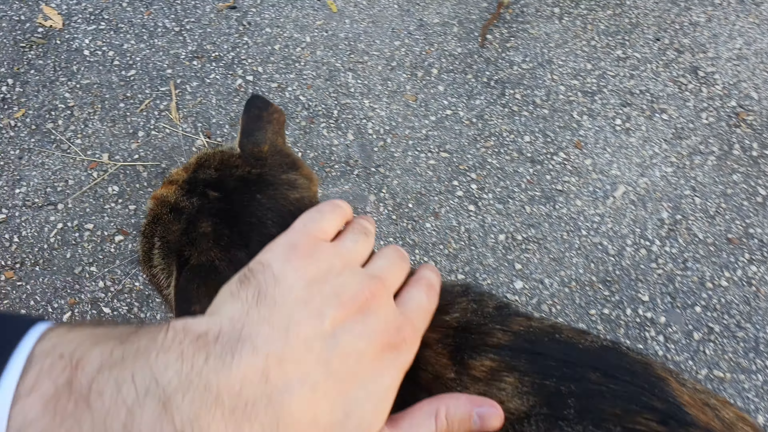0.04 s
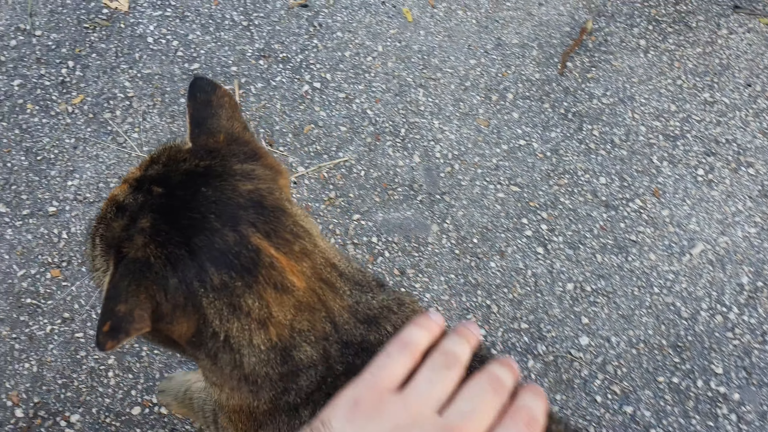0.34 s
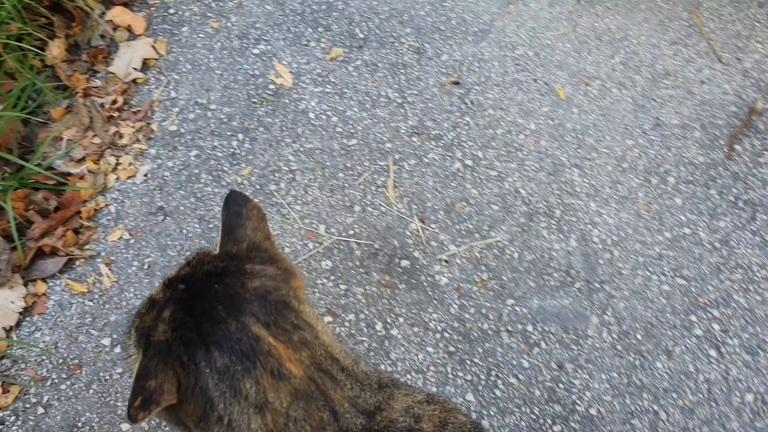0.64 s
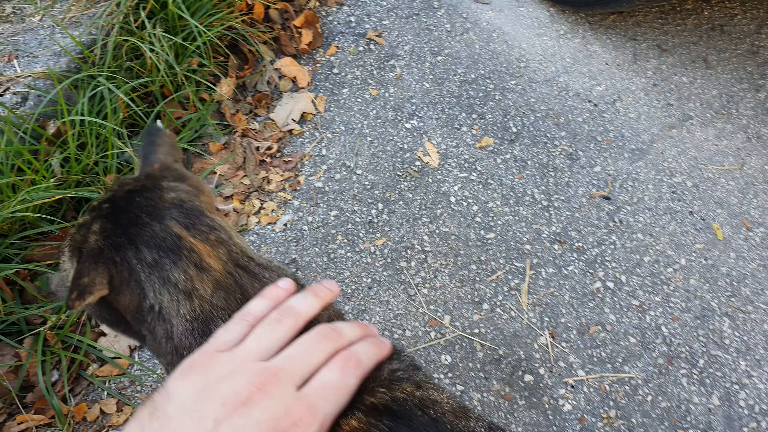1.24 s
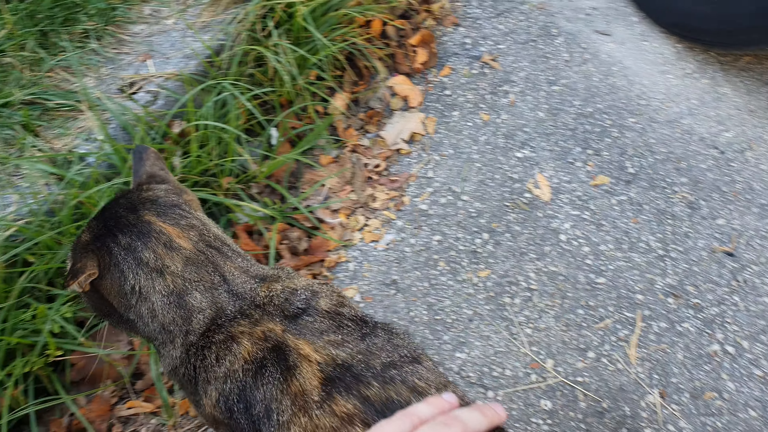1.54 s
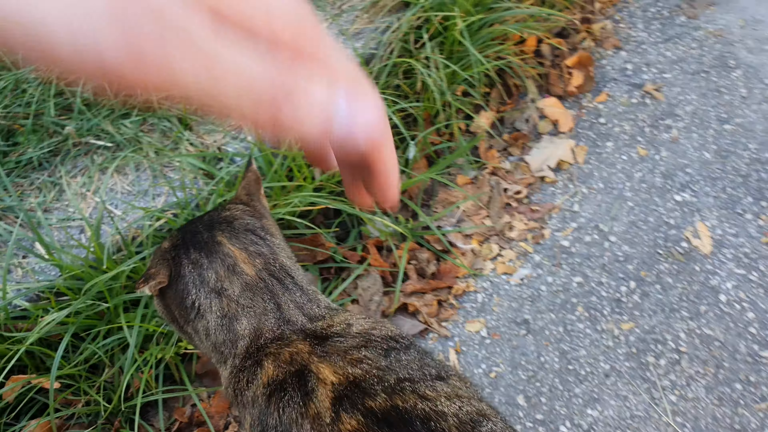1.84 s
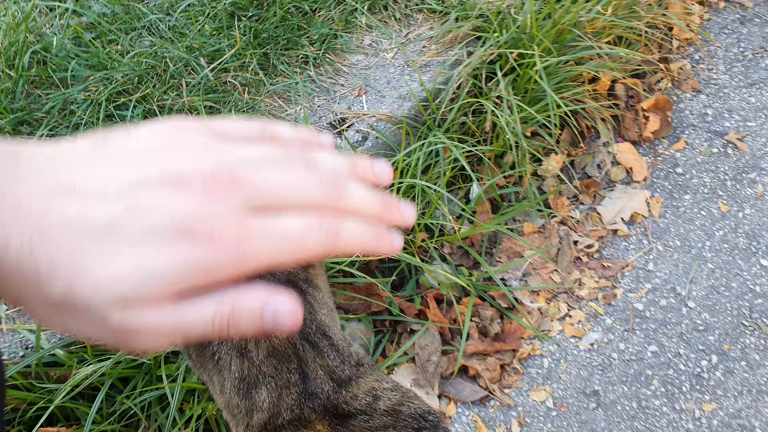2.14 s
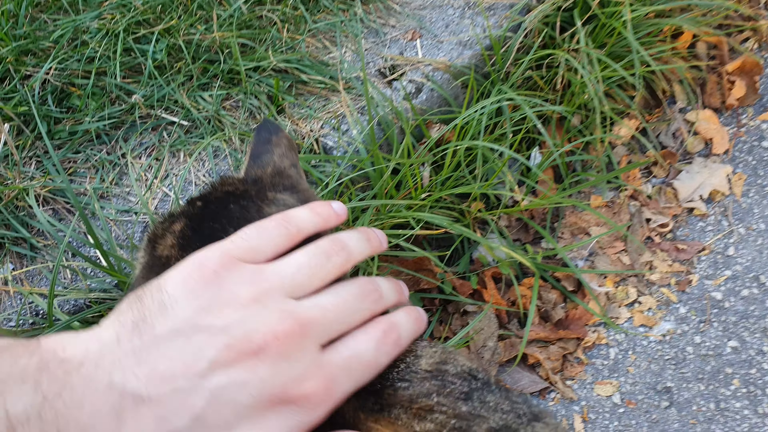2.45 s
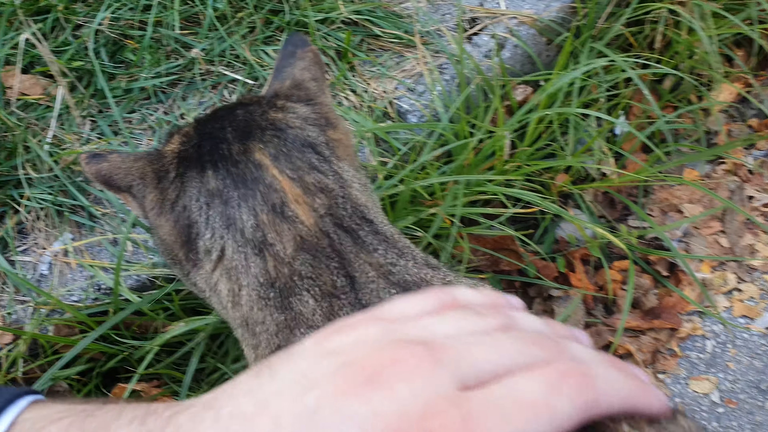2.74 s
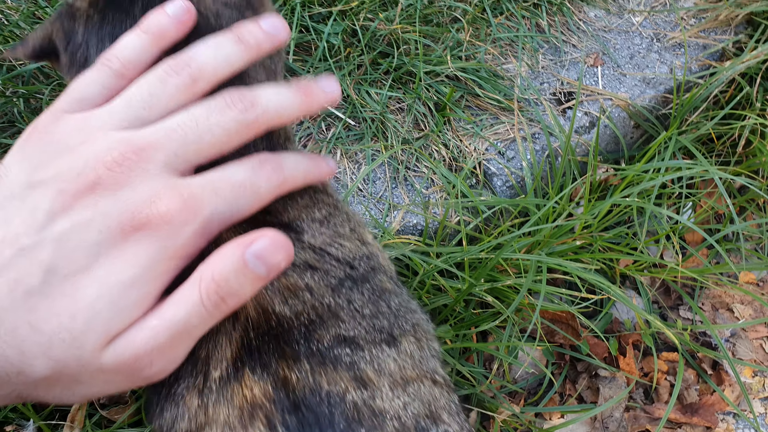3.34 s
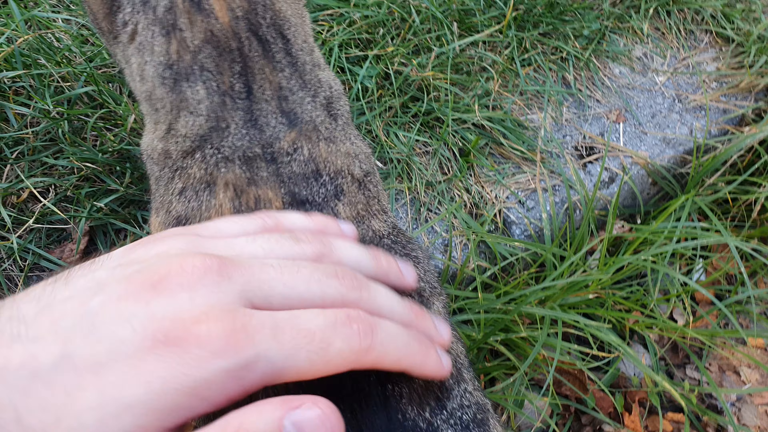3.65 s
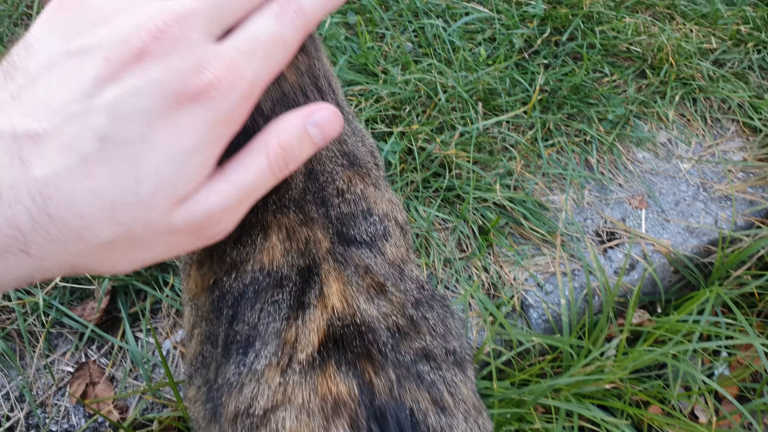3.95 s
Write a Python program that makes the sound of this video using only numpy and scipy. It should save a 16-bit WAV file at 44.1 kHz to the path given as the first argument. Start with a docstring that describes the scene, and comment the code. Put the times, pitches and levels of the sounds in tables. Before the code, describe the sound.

A hand strokes a cat, its fur hissing softly as a sleeve swishes with each reach. Dry leaves tick and crunch underfoot over a low rumble of light wind, and fingers knock lightly on the close, hand-held microphone.

```python
"""Fur hisses softly over a low rumble of light wind as a hand strokes a cat outdoors, close to a
hand-held camera. The hiss is stick-slip friction, as is the swish of the sleeve on each reach; hollows
under the hand resonate with it. Dry leaves and grass tick and crunch underfoot in fast-decaying bursts,
and fingers shifting on the camera add a grumble and small knocks."""
import sys
import numpy as np
from scipy import signal
from scipy.fft import rfft, irfft
from scipy.io import wavfile

SR = 44100
rng = np.random.default_rng(int(sys.argv[2]) if len(sys.argv) > 2 else 0)


def to_wav(sig):
    """Store sig (one row per channel, or 1-D mono) as 16-bit WAV at the path in sys.argv[1].

    Samples outside -1..1 are clipped; the rate is SR.
    """
    pcm = np.clip(np.atleast_2d(sig), -1, 1) * 32767
    pcm = np.round(pcm).astype(np.int16)
    wavfile.write(sys.argv[1], SR, pcm.T)  # frames by channels


N = 176400
T = np.arange(N) / SR

# spectra of the sources: (frequency [Hz], relative density [dB])
AIR_SPECTRUM = [(150, -1), (250, 3.5), (400, -6), (700, -7), (1000, -13.5), (2000, -36.5)]
WIND_SPECTRUM = [(20, -15), (32, -18.5), (42, -13), (54, -3.5), (75, -2), (105, -4.5), (130, -17.5),
                 (220, -30)]
GRIP_SPECTRUM = [(90, -9), (130, 1.5), (155, 3.5), (200, -2), (260, -6), (350, -12), (550, -22.5),
                 (1000, -37)]
KNOCK_SPECTRUM = [(70, -3), (150, -7.5), (260, 10), (450, -1.5), (800, -10), (1400, -15), (2300, -50),
                  (4000, -57)]
SNAP_SPECTRUM = [(200, -29), (450, -14), (1100, 4.5), (1450, 11.5), (1900, -3), (2400, 5), (3200, 3.5),
                 (4500, 2.5), (6800, 3), (8200, -11.5), (10300, -21), (11600, -4), (15000, -9), (16000, -4)]
BRUSH_SPECTRUM = [(700, -2), (1500, -7), (2500, -2.5), (3900, 1.5), (6500, -0.5), (8200, -8.5),
                  (12500, -4.5), (16000, -12.5)]
RUB_SPECTRUM = [(230, -11.5), (350, -6), (480, 5.5), (680, -3), (850, -2), (1100, -11.5), (2000, -22)]
SLEEVE_SPECTRUM = [(600, -12), (950, -6), (1250, 0.5), (1500, 0.5), (1800, -2), (2300, -5), (3200, -5.5),
                   (5000, -7.5), (9000, -17)]
FUR_SPECTRUM = [(1200, -22), (2000, -2), (3000, 0), (4500, 1), (6800, 0), (7900, -10.5), (11000, -6.5),
                (12000, -9), (14500, -9.5), (16000, -28)]
# envelopes of the sustained sources: (time [s], relative level [dB])
WIND_LEVEL = [(0.0, -45), (0.2, -44), (0.52, -50), (0.6, -57), (0.66, -49), (0.9, -45.5), (1.0, -51.5),
              (1.25, -47), (1.8, -50.5), (1.9, -48), (2.2, -47.5), (2.32, -52.5), (2.56, -43.5),
              (2.63, -48), (2.72, -40.5), (2.85, -42.5), (2.95, -50), (3.22, -46.5), (3.52, -49.5),
              (3.63, -43), (4.0, -47.5)]
GRIP_LEVEL = [(0, -54), (.45, -54.5), (.7, -53.5), (.9, -54), (1.1, -59), (1.7, -58), (1.95, -52.5),
              (2.4, -55.5), (2.7, -50.5), (2.79, -53), (2.845, -43.5), (2.93, -52), (3.02, -53.5),
              (3.1, -50), (3.24, -54.5), (3.33, -54), (3.45, -50), (3.65, -53), (3.8, -54.5), (4, -51.5)]
RUB_LEVEL = [(0, -65.5), (.35, -62.5), (.55, -64), (.72, -61.5), (.87, -59.5), (1.14, -72), (1.47, -86),
             (1.59, -64.5), (1.98, -61), (2.36, -71), (2.54, -60), (2.8, -62.5), (3.3, -69.5), (4, -71)]
SLEEVE_LEVEL = [(0, -64), (.56, -71), (.66, -61.5), (.88, -60.5), (1.05, -70.5), (1.5, -78), (1.65, -64.5),
                (1.81, -57.5), (2.12, -62), (2.4, -70), (2.58, -62), (3.0, -68), (3.4, -71), (3.75, -74.5),
                (4, -66.5)]
FUR_LEVEL = [(0, -61), (.22, -57.5), (.48, -64), (.70, -59.5), (.91, -61.5), (1.0, -69.5), (1.12, -66),
             (1.2, -68), (1.36, -68), (1.54, -72), (1.68, -64.5), (1.82, -56), (2.12, -61), (2.40, -67.5),
             (2.61, -59.5), (2.78, -63), (2.94, -64.5), (3.15, -68.5), (3.5, -71), (3.72, -72), (3.81, -73),
             (3.92, -63), (4, -77)]
# likeness of left and right: (frequency [Hz], correlation [-])
CORRELATION = [(30, 1), (60, 0.96), (170, 0.93), (350, 0.8), (700, 0.34), (1400, -0.28), (2800, -0.036),
               (5600, -0.14), (12000, 0.016)]
# balance, mostly leftward: (frequency [Hz], left minus right [dB])
BALANCE = [(30, 3), (80, 0.5), (170, 1), (350, 3), (700, 4.5), (1400, 3.5), (2800, 2.6), (4500, 0),
           (6500, -1.5), (8500, 11.5), (11000, 7), (15000, 7)]
# reflections between hand and camera: (delay [s], gain [-])
ECHOES = [(.0011, 0.12), (.0027, .16), (.0058, 0.11)]
# low tones in the rumble: (frequency [Hz], bandwidth [Hz], level [dB])
DRONE_BANDS = [(52.9, 2, -54.5), (104.7, 4.6, -63), (152.3, 11.2, -71)]
# passing hums: (time [s], half length [s], frequency [Hz], glide [Hz/s], level [dB])
HUM_SWELLS = [(0.38, 0.073, 181.2, -33, -55.5), (0.49, 0.046, 60.8, -58, -43),
              (1.96, 0.041, 151.4, -10, -52.5), (2.24, 0.023, 52.3, -5, -41),
              (2.55, 0.035, 62.8, 110, -44.5), (2.845, 0.019, 88, 0, -47), (2.835, 0.016, 154, 0, -52),
              (3.12, 0.055, 149.5, -78, -50), (3.25, 0.036, 228, 0, -54.5), (3.6, 0.14, 166, -2, -57.5)]
# knocks of the grip: (time [s], strength [dB])
GRIP_KNOCKS = [(1.836, -36), (1.957, -38), (2.0415, -35.5), (2.552, -40), (2.820, -49), (2.834, -46),
               (2.909, -42), (3.058, -41), (3.200, -37), (3.451, -41.5), (3.609, -38), (3.734, -40),
               (3.89, -45)]
# struck twigs and leaves: (time [s], mode 1 [Hz], level [dB], mode 2 [Hz], level [dB], decay [s])
TWIG_MODES = [(1.838, 1110, -38, 2480, -38.5, 0.0018), (1.962, 1380, -39, 2100, -37, 0.0011),
              (2.0425, 470, -42.5, 1830, -48, 0.0037), (2.1037, 2230, -35, 4200, -53, 0.001),
              (2.2136, 1780, -38.5, 4800, -36, 0.0022), (3.4497, 480, -44.5, 1290, -51.5, 0.0025),
              (3.611, 430, -43.5, 1320, -54.5, 0.0029), (3.8895, 4400, -34.5, 630, -34, 0.00069),
              (3.9216, 4200, -41, 785, -40, 0.00095)]
# breaking leaves and twigs:
# (time [s], strength [dB], body gain [dB], treble gain [dB], tail gain [dB], left minus right [dB])
LEAF_SNAPS = [(0.3506, -43, -6, -7, -10, 7), (0.52, -42.5, -12, -15, -7, 0),
              (0.574, -43.5, -31, 4, -14, -15), (0.591, -42, -26, 4, -20, -1),
              (0.622, -36, -26, 3, -20, -2), (.6735, -34.5, -24, 9, -14, -5), (0.696, -37, -24, 2, -22, 0),
              (0.718, -40, -24, 3, -20, 1.5), (0.751, -34.5, 4, 6, -19, -6), (0.869, -37, -24, -2, -18, -8),
              (.912, -34, -12, 2, -22, -6), (0.9203, -24, -22, 15, -32, 4), (0.987, -42, -24, -2, -20, -1),
              (1.036, -44.5, -28, -2, -5, -6), (1.066, -47.5, -20, 1, -3, -1),
              (1.105, -50, -22, -4, -8, -8), (1.167, -44, -22, 1, -9, 1), (1.208, -47.5, -24, -9, -10, -5),
              (1.261, -48.5, -22, 1, 2, 0), (1.838, -29, 0, -24, -26, 6), (1.9621, -30, -2, -7, -9.5, 0),
              (1.9705, -47, -12, 10, -16, 0), (2.042, -43.5, 8, -21, -10, 12),
              (2.1032, -37.5, -10, -30, -1.5, -5), (2.2131, -18, -16, 8, -13, 0),
              (2.2563, -37, -14, -38, -8, 2), (2.444, -44, -10, 7, -18, 5), (2.531, -39, 7, 11, -9, 6),
              (2.601, -38.5, -5, -28, -11, 8), (2.632, -34.5, -20, 5, -11, 5.5),
              (3.1998, -46, 28, -14, -14, -3), (3.215, -46, -32, -1, -4, -6),
              (3.2796, -35.5, -30, 12, -15, -18), (3.45, -57, 22, -20, -16, 0), (3.476, -42, 9, 7, -5, -5),
              (3.531, -45.5, -18, 4, -6, 3), (3.576, -46, -24, 0, -22, 5), (3.611, -44.5, -19, 2, -12, -3),
              (3.617, -42.5, -14, 8, -5, 5), (3.7135, -47, -4, -14, -6, -6), (3.823, -44, -6, -9, -10, -17),
              (3.835, -41, -4, -8, -12, -3), (3.8452, -38, -8, -27, -8, -4), (3.857, -42, 8, -16, -10, -6),
              (3.8892, -37.5, -7, -27, -6.5, -1), (3.9229, -37, -7, -24, -6.5, -2)]
# hollows: (time [s], half length [s], frequency [Hz], glide [Hz/s], bandwidth [Hz], level [dB])
CAVITIES = [(0.201, 0.15, 3200, -1500, 1100, -60.5), (0.67, 0.13, 1290, 302, 110, -69),
            (0.732, 0.069, 840, 139, 120, -60), (0.866, 0.024, 637, 0, 70, -57),
            (1.297, 0.27, 631, -56, 49.7, -70), (1.076, 0.15, 1690, -600, 133, -71.5),
            (1.845, 0.03, 1140, 0, 130, -76), (2.557, 0.029, 895, 3, 130, -61),
            (2.738, 0.066, 885, -300, 90, -61.5), (2.751, 0.11, 586, 0, 90, -72),
            (3.018, 0.021, 4100, 0, 260, -63), (3.273, 0.064, 4660, 3000, 260, -67),
            (3.55, 0.22, 756, 0, 40, -73)]
# brief brushes: (time [s], half length [s], level [dB], left minus right [dB])
BRUSH_SWELLS = [(0.707, 0.024, -54, -5), (0.783, 0.035, -65, 0), (2.216, 0.0053, -50.5, 13),
                (2.244, 0.017, -49, -1), (2.634, 0.052, -62.5, -1), (3.03, 0.02, -51.5, -0.5),
                (3.28, 0.07, -59, -6), (3.523, 0.058, -62, -7), (3.832, 0.011, -49, -3),
                (3.873, 0.014, -57, -3)]


def from_db(db):
    """Decibels to amplitude ratio."""
    return 10 ** (np.asarray(db) / 20)


def rms_one(x):
    """Normalisation to unit power."""
    return x / np.sqrt(np.mean(x ** 2) + 1e-20)


def level(rows, offset_db):
    """Amplitude envelope, interpolated in decibels."""
    return from_db(np.interp(T, *np.transpose(rows)) + offset_db)


def swell(time, half):
    """Gaussian envelope with standard deviation `half`."""
    return np.exp(-.5 * ((T - time) / half) ** 2)


def at_hz(points, hz):
    """Interpolation on a log-frequency axis."""
    frequencies, values = np.transpose(points)
    return np.interp(np.log(hz + 1), np.log(frequencies), values)


def pan(db):
    """A level difference between the ears gives direction."""
    return from_db(np.array([[db], [-db]]) / 2)


def add(out, time, sound):
    """Superposition of a short sound at its onset."""
    start = max(int(time * SR), 0)
    out[:, start:start + sound.shape[1]] += sound[:, :max(N - start, 0)]


def coloured(pair, spectrum):
    """Mid-side filtering gives two independent signals a spectrum and stereo width, at unit power."""
    hz = np.linspace(1, SR / 2, pair.shape[1] // 2 + 1)
    low_hz, high_hz = spectrum[0][0] / 2, spectrum[-1][0] * 2
    skirts = 1 / np.sqrt((1 + (hz / high_hz) ** 4) * (1 + (low_hz / hz) ** 4))
    mid, side = rfft(pair) * from_db(at_hz(spectrum, hz)) * skirts
    alike = np.clip(at_hz(CORRELATION, hz), -.99, .99)
    signs = np.array([[1], [-1]])
    stereo = np.sqrt(1 + alike) * mid + np.sqrt(1 - alike) * side * signs
    return rms_one(irfft(stereo * from_db(signs * at_hz(BALANCE, hz) / 2)))


def drift(half_width_hz, centre_hz=0):
    """Narrow-band noise of unit power: the narrower, the slower it fluctuates."""
    hz = np.linspace(0, SR / 2, N // 2 + 1)
    return rms_one(irfft(rfft(rng.standard_normal(N)) / (1 + ((hz - centre_hz) / half_width_hz) ** 2)))


def friction(spectrum, grains_per_s, grain_share, spread_db, flutter_db):
    """Stick-slip: many fibres slide as a hiss, single ones catch and click, and the pressure flutters."""
    sizes = from_db(spread_db * np.minimum(rng.exponential(1, N), 4))
    catches = rng.random(N) < grains_per_s / SR
    grains = rms_one(catches * sizes * rng.standard_normal((2, N)))
    slips = np.sqrt(grain_share) * grains + np.sqrt(1 - grain_share) * rng.standard_normal((2, N))
    return coloured(slips, spectrum) * from_db(flutter_db * drift(54))


def burst(spectrum, decay_s, tail_s, tail_db, size=4096):
    """Impulsive contact: noise with a fast exponential decay and a longer tail of scatter."""
    t = np.arange(size) / SR
    envelope = np.exp(-t / decay_s) + from_db(tail_db) * np.exp(-t / tail_s)
    sound = coloured(rng.standard_normal((2, size)), spectrum) * envelope
    return rms_one(sound) * np.sqrt(np.mean(envelope ** 2)) / 2


def air(level_db=-66.5):
    """Distant outdoor sounds merge into stationary noise."""
    return from_db(level_db) * coloured(rng.standard_normal((2, N)), AIR_SPECTRUM)


def rumble():
    """Turbulence of light wind, over a far drone that wavers as narrow-band noise does."""
    drone = sum(from_db(db) * drift(width / 2, hz) for hz, width, db in DRONE_BANDS)
    wind = level(WIND_LEVEL, 0) * coloured(rng.standard_normal((2, N)), WIND_SPECTRUM)
    return drone + wind


def hums():
    """Low tones swell and fade, most gliding as linear chirps."""
    out = 0
    for time, half, hz, glide, db in HUM_SWELLS:
        cycles = hz * (T - time) + glide * (T - time) ** 2 / 2 + rng.random()
        out += from_db(db) * swell(time, half) * np.sqrt(2) * np.sin(2 * np.pi * cycles)
    return out


def handling(attack_s=0.00052, size=4096):
    """Structure-borne sound: fingers rub and softly knock on the camera."""
    out = friction(GRIP_SPECTRUM, grains_per_s=39, grain_share=0.22, spread_db=1.5, flutter_db=1)
    out *= level(GRIP_LEVEL, -0.5)
    attack = 1 - np.exp(-np.arange(size) / SR / attack_s)
    for time, db in GRIP_KNOCKS:
        knock = burst(KNOCK_SPECTRUM, decay_s=0.0045, tail_s=0.0085, tail_db=-21)
        add(out, time, from_db(db) * attack * knock)
    return out


def taps(size=2048):
    """Free vibration: a struck twig or stiff leaf rings in two damped modes."""
    out, t = np.zeros((2, N)), np.arange(size) / SR
    for time, main_hz, main_db, second_hz, second_db, decay_s in TWIG_MODES:
        for hz, db in (main_hz, main_db), (second_hz, second_db):
            phase = 2 * np.pi * hz * t + rng.uniform(-1, 1, (2, 1))
            add(out, time, from_db(db) * np.exp(-t / decay_s) * np.sin(phase))
    return out


def snaps():
    """Brittle fracture of leaves and twigs: thick ones have more body, thin ones more treble."""
    out = np.zeros((2, N))
    hz, db = np.transpose(SNAP_SPECTRUM)
    body = at_hz([(1200, 1.0), (3500, 0.058)], hz)
    treble = at_hz([(6000, 0), (11000, 1)], hz)
    for time, strength_db, body_db, treble_db, tail_db, side_db in LEAF_SNAPS:
        spectrum = np.transpose([hz, db + body_db * body + treble_db * treble])
        snap = burst(spectrum, decay_s=.0009, tail_s=.0065, tail_db=tail_db)
        add(out, time, from_db(strength_db) * pan(side_db) * snap)
    return out


def hollows():
    """Cavity resonance: gaps between hand, sleeve and fur ring as they open, slide and close."""
    out = 0
    for time, half, hz, glide, width, db in CAVITIES:
        peak = [(hz - 2 * width, -28), (hz - width / 2, -4), (hz, 0),
                (hz + width / 2, -4), (hz + 2 * width, -28), (hz + 6 * width, -50)]
        ring = coloured(rng.standard_normal((2, N)), peak)
        frequency_shift = np.exp(1j * np.pi * glide * (T - time) ** 2)
        out += from_db(db) * swell(time, half) * (signal.hilbert(ring) * frequency_shift).real
    return out


def brushes():
    """Brief sliding friction through fur and grass makes grainy swells."""
    gain = sum(from_db(db) * pan(side_db) * swell(time, half) for time, half, db, side_db in BRUSH_SWELLS)
    hiss = friction(BRUSH_SPECTRUM, grains_per_s=2200, grain_share=0.32, spread_db=4.5, flutter_db=2.5)
    return gain * hiss


def sleeve():
    """Cloth friction gives a swish and a duller rub on each reach."""
    swish = friction(SLEEVE_SPECTRUM, grains_per_s=270, grain_share=0.046, spread_db=-3.5, flutter_db=0.5)
    rub = friction(RUB_SPECTRUM, grains_per_s=150, grain_share=0.27, spread_db=2.5, flutter_db=0.35)
    return level(SLEEVE_LEVEL, 3.5) * swish + level(RUB_LEVEL, 3) * rub


def fur():
    """Friction under the palm: dense slips fuse into a hiss, single hairs crackle."""
    hiss = friction(FUR_SPECTRUM, grains_per_s=2500, grain_share=0.075, spread_db=4.5, flutter_db=1)
    crackle = friction(FUR_SPECTRUM, grains_per_s=260, grain_share=0.93, spread_db=2, flutter_db=-1)
    return level(FUR_LEVEL, 2) * hiss + level(FUR_LEVEL, -5.5) * crackle


def reflected(direct, wander=0.1015):
    """Comb filtering: short reflections interfere, their paths changing as the hand moves."""
    out = direct.copy()
    for delay_s, gain in ECHOES:
        delayed_time = T - delay_s * (1 + wander * drift(0.95))
        out += gain * np.array([np.interp(delayed_time, T, channel) for channel in direct])
    return out


def scene():
    """Linear superposition of all sources in the open air."""
    background = air() + rumble() + hums() + handling()
    underfoot = taps() + snaps()
    stroking = hollows() + reflected(brushes() + sleeve() + fur())
    return background + underfoot + stroking


def record(dry, cutoff_hz=15950):
    """A steep low-pass filter limits the bandwidth."""
    return signal.sosfilt(signal.ellip(12, .1, 70, cutoff_hz, fs=SR, output="sos"), dry)


dry = scene()
out = record(dry)
to_wav(out)
```